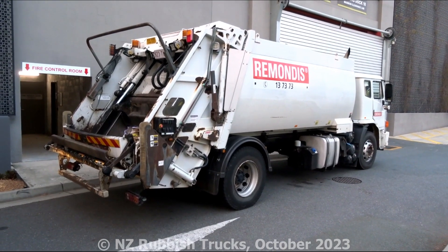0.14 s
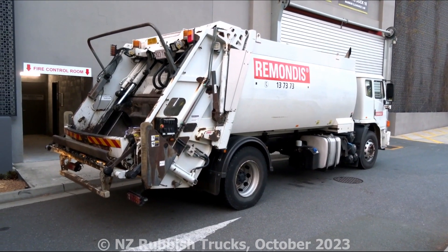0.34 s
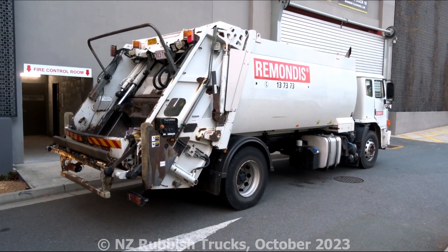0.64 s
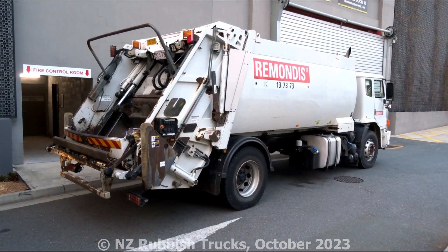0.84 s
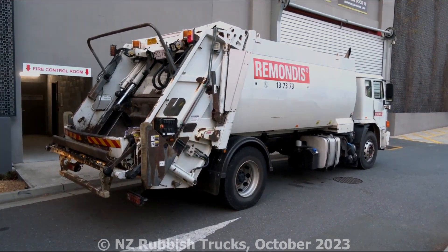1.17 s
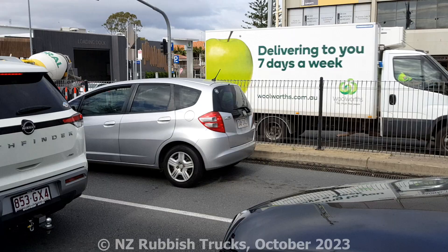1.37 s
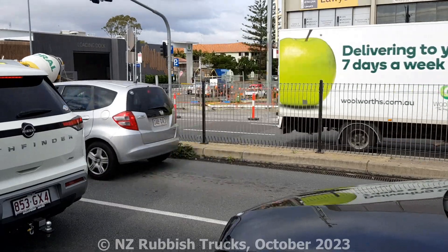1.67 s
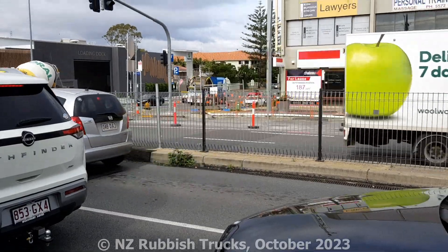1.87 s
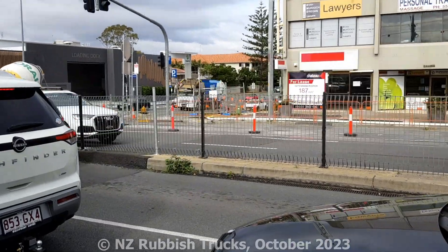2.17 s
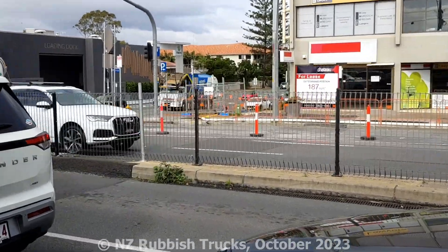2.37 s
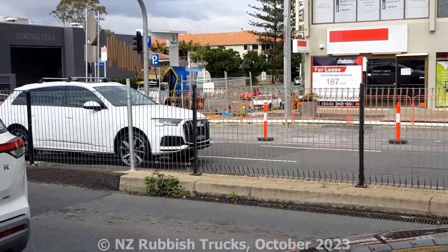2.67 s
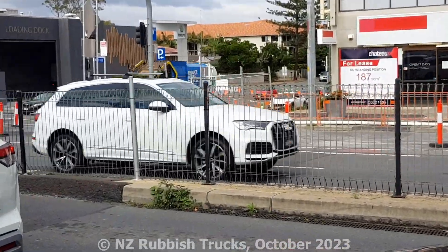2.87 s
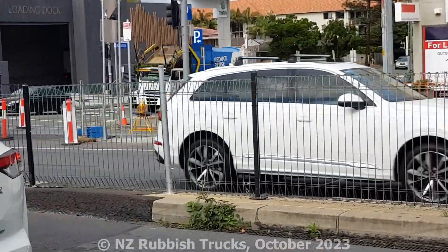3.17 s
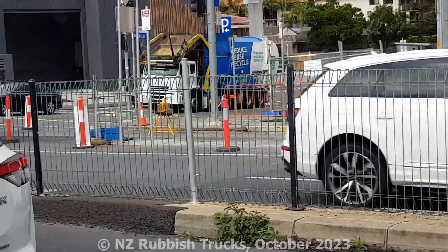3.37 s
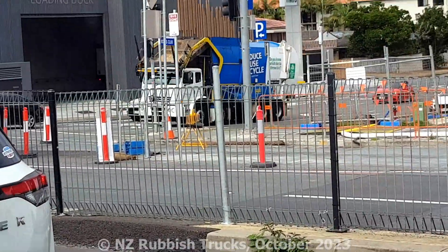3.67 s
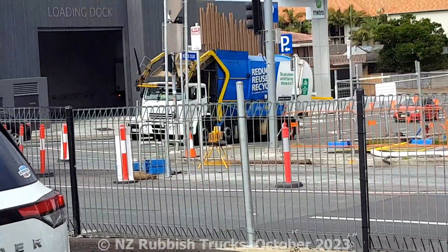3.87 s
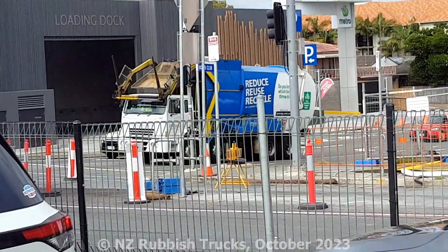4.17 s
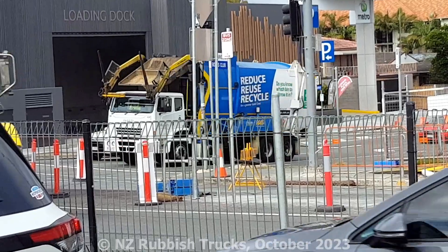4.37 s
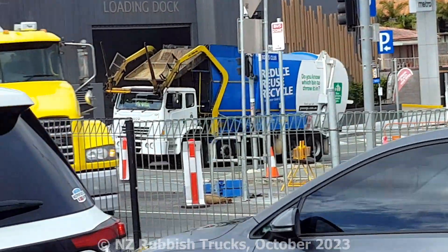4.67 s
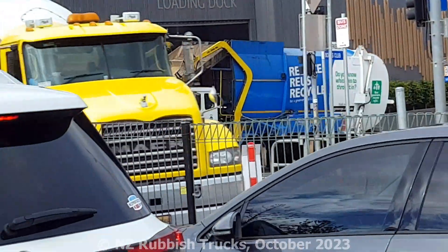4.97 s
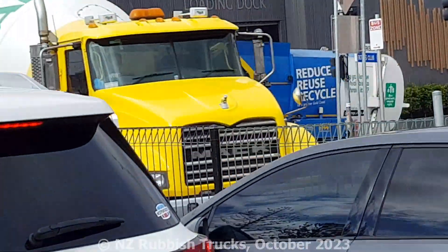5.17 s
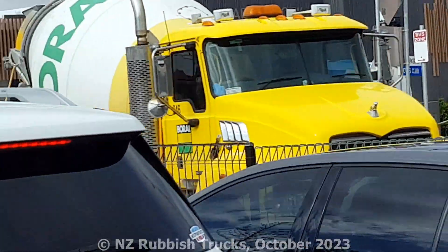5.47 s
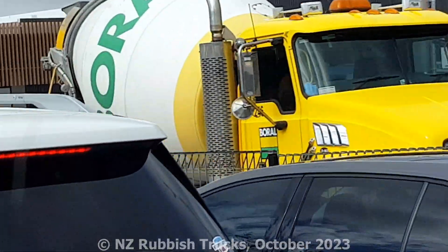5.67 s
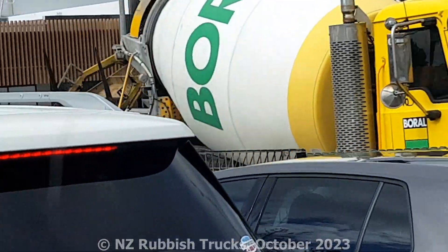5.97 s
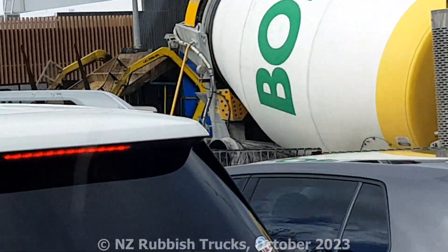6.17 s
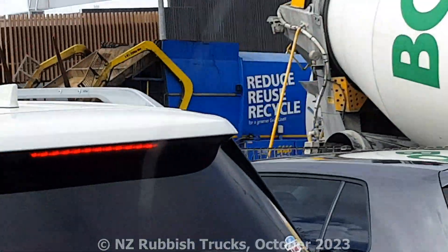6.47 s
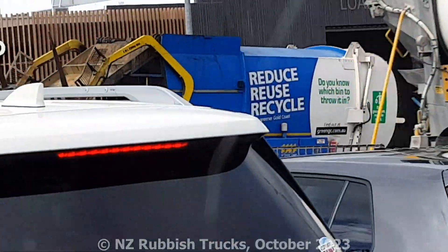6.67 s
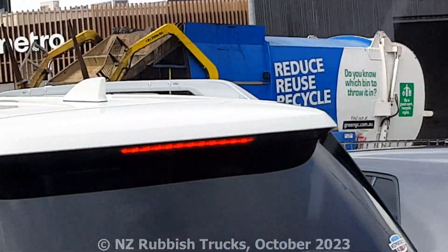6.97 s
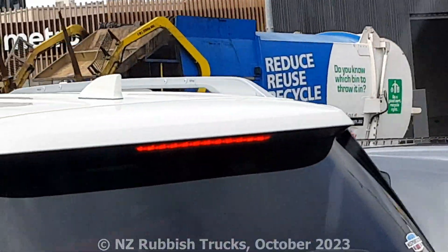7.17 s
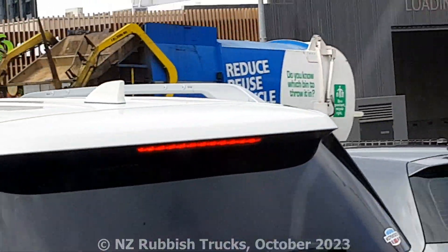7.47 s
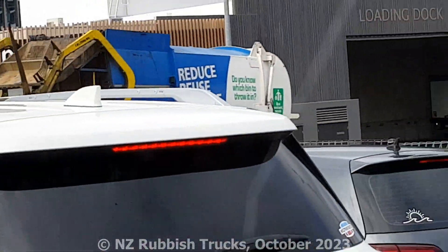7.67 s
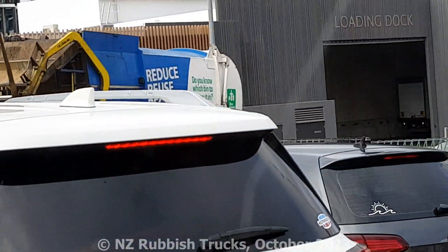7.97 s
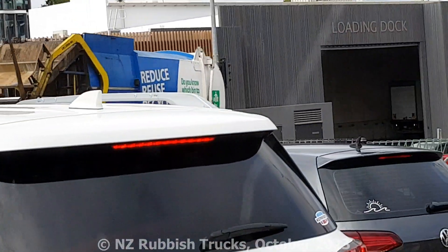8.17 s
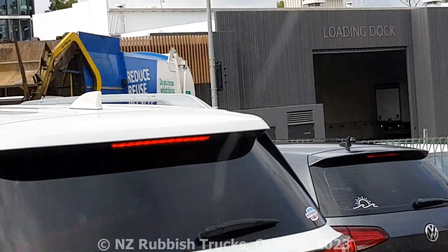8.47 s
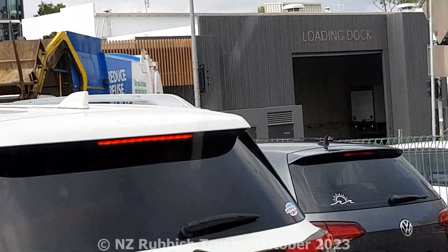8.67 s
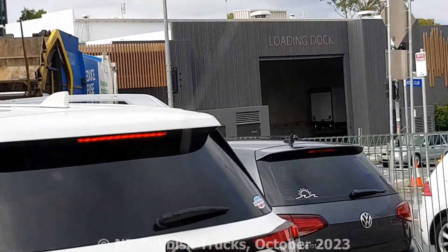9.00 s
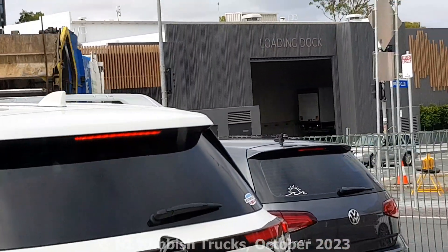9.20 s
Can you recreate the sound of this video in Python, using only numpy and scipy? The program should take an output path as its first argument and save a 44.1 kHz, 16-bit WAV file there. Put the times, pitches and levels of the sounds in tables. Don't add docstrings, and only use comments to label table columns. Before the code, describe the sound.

Close, harsh truck pump whine over a rough engine, a blink of silence, then a muffled car interior as a heavy truck pulls past outside.

```python
import sys
import numpy as np
from scipy import signal
from scipy.fft import next_fast_len
from scipy.io import wavfile
from scipy.ndimage import uniform_filter1d

SR = 44100
rng = np.random.default_rng(int(sys.argv[2]) if len(sys.argv) > 2 else 0)


def inscribe(sig):
    pcm = np.round(np.clip(np.atleast_2d(sig).T, -1, 1) * 32767)
    wavfile.write(sys.argv[1], SR, pcm.astype(np.int16))


def convert_level_to_amplitude(level_db):
    exponent = np.asarray(level_db, float) / 20
    return 10 ** exponent


N = 411894
CABIN_S = 1.4635

# frequency in Hz, left minus right in dB.
ALLEY_PAN = [(60, 0.0), (130, 0), (290, 0.5), (640, 1), (1410, 2), (3100, -3.5), (6820, -2.5),
             (15000, -1.5)]


def read(points, hz):
    f, value = np.transpose(points)
    return np.interp(np.log(hz + 1), np.log(f + 1), value)


def evened(x):
    return x / np.sqrt(np.mean(np.abs(x) ** 2) + 1e-20)


def drift(width_hz, count):
    z = rng.standard_normal(count) + 1j * rng.standard_normal(count)
    f = np.fft.fftfreq(count, 1 / SR)
    return evened(np.fft.ifft(z / (1 + (2 * f / width_hz) ** 2)))


def smoothed_chance(z, bins, frames):
    return evened(uniform_filter1d(uniform_filter1d(z, size=bins, axis=-2), size=frames, axis=-1))


def noise(layers, same, pan, lead, patchy_db, swell_db, ripple_db, count):
    frames, hz = count // 512 + 5, np.fft.rfftfreq(2048, 1 / SR)
    a, b, c, d, patches = rng.standard_normal((frames, 1025, 5)).T
    patches = smoothed_chance(patches, 20, 6)
    swell = evened(uniform_filter1d(rng.standard_normal(frames), size=8))
    ripple = rng.standard_normal((frames // 128 + 1, 1025, 2)).T
    ripple = np.repeat(ripple, 128, axis=2)[..., :frames]
    ripple = smoothed_chance(ripple, 4, 128)

    alike = np.clip(read(same, hz), 0, 1)[:, None]
    apart = np.sqrt(1 - alike ** 2)
    left = a + 1j * b
    right = (alike * left + apart * (c + 1j * d)) * np.exp(-1j * read(lead, hz))[:, None]
    tilt = convert_level_to_amplitude(read(pan, hz))[:, None]
    power = 0
    for shape, db in layers:
        power = power + np.outer(evened(convert_level_to_amplitude(read(shape, hz))), convert_level_to_amplitude(db[:frames])) ** 2
    z = np.array([left * tilt, right]) / (1 + tilt) * np.sqrt(power)

    shared = alike * ripple[0] + apart * ripple
    shared *= np.clip(hz / 3000, 0.2, 1)[:, None]
    z *= convert_level_to_amplitude(patchy_db * patches + swell_db * swell + ripple_db * shared / np.sqrt(1 + alike))
    x = signal.istft(z, nperseg=2048, noverlap=1536)[1][:, :count]
    return x * np.sqrt(power.mean() / np.mean(x.mean(0) ** 2))


def panned(x, pan_db):
    left = convert_level_to_amplitude(pan_db)
    return np.array([left * x, x]) * 2 / (1 + left)


def pump_whine(count):
    # frequency in Hz, waver width in Hz, level in dB rms.
    teeth = [(226, 8, -52), (377, 8, -47), (484.5, 12, -39), (576.5, 8, -40), (715, 10, -44),
             (850.6, 12, -33.5), (1308, 10, -47), (1546, 16, -46), (1832, 18, -38), (2046, 12, -48),
             (2153.5, 6, -38), (2278.5, 8, -36), (2400.5, 8, -40), (2525, 12, -36), (2618, 24, -36),
             (3004, 35, -41), (3122, 20, -49), (3386, 12, -57), (3585, 10, -54), (3710, 8, -50),
             (3925, 12, -50), (4773, 60, -50), (5543, 25, -60), (5922, 20, -66)]
    t, out = np.arange(count) / SR, np.zeros((2, count))
    for hz, width_hz, db in teeth:
        loose = np.clip(width_hz / 25, 0, 1)
        waver = np.sqrt(1 - loose ** 2) + loose * drift(2 * width_hz, count)
        ports = [waver + 0.17 * drift(4.8 + width_hz, count) for _ in range(2)]
        turn = np.exp(2j * np.pi * (hz * t + rng.random()))
        pan_db = read(ALLEY_PAN, hz) * np.array([[0.5], [-0.5]])
        out += convert_level_to_amplitude(db + 3.0 + pan_db) * (ports * turn).real
    return out


def refuse_truck():
    # frequency in Hz, density in dB per Hz.
    block = [(18, -61), (30, -42), (85, -28), (135, -16.5), (270, -15.5), (319, -7), (391, -11.5),
             (479, -3.5), (782, -8.5), (850, 2), (941, -10.5), (1100, -5), (1190, -7), (1390, -3),
             (1700, -20), (2210, -40), (3740, -120)]
    # frequency in Hz, density in dB per Hz.
    pipes = [(880, -33), (1500, -2.5), (1650, -5), (1860, 1.5), (1950, -8.5), (2210, -1), (2550, 2.5),
             (2770, -8), (3080, -3), (3320, -14), (3830, -8), (4040, -15.5), (4300, -28.5), (5590, -58),
             (9460, -120)]
    # frequency in Hz, density in dB per Hz.
    valves = [(2470, -38), (4200, -18), (4490, -4), (4600, -12), (4770, 3), (4930, -6.5), (5170, -7),
              (5710, -5), (7730, -10.5), (10600, -5), (10900, -2), (14200, -42), (22000, -120)]
    # frequency in Hz, likeness from 0 to 1.
    alley_same = [(60, 0.86), (130, 1), (290, 0.98), (640, 1), (1410, 0.88), (3100, 0.92), (6820, 0.73),
                  (15000, 1)]
    shaft_hz, edge_hz = 26.6, 11020
    fade_s, silent_s = 1.398, 1.422
    count = next_fast_len(round(1.5 * SR))
    t = np.arange(count) / SR
    block_db, pipes_db, valves_db = np.outer([-24.5, -25.5, -40.0], np.ones(count))

    ports = alley_same, ALLEY_PAN, [(1, 0)]
    roar = noise([(block, block_db), (pipes, pipes_db)], *ports, 0.47, 0.21, 4.25, count)
    turns = shaft_hz * t + 0.35
    knock = 1 + 0.12 * np.cos(2 * np.pi * turns) + 0.06 * np.cos(6 * np.pi * turns)
    clatter = noise([(valves, valves_db)], *ports, 1.4, 0.43, 1.8, count) * knock
    edge = signal.firwin(801, edge_hz, window=("kaiser", 10), fs=SR)
    sound = signal.oaconvolve(roar + clatter + pump_whine(count), edge[None], "same")
    fade = np.clip((silent_s - t) / (silent_s - fade_s), 0, 1)
    return np.pad(sound * fade, ((0, 0), (0, N - count)))


def cabin_levels():
    queue_s, turn_s, turn_length_s = 1.54, 5, 0.36
    t = np.arange(N // 512 + 8) * 512 / SR
    since = np.maximum(t - CABIN_S, 0)
    queue = np.exp(-(since / queue_s) ** 2)
    turned = 0.5 + 0.5 * np.tanh((t - turn_s) / turn_length_s)
    rumble_db = -34 + 2.5 * queue + 0.94 * turned
    tyres_db = -45.5 - 2 * since - 2 * turned
    blow_db = -45 + 0.85 * queue + 1.32 * turned
    fizz_db = -61 + 3.5 * queue
    duct_db = -53 + 1.5 * turned
    return rumble_db, tyres_db, blow_db, fizz_db, duct_db


def cabin_air():
    # frequency in Hz, density in dB per Hz.
    rumble = [(10, -13), (45, -9), (58, -3), (100, -5), (170, -5), (220, -8.5), (278, -16.5), (369, -14.5),
              (457, -20.5), (607, -32.5), (800, -62.5)]
    # frequency in Hz, density in dB per Hz.
    tyres = [(300, -70), (560, -35), (700, 1), (780, 3.5), (900, 4.5), (1000, -26), (1300, -24),
             (1700, -4.5), (2200, -12), (4000, -60), (10000, -58), (13000, -47), (15600, -54)]
    # frequency in Hz, density in dB per Hz.
    blow = [(250, -50), (500, -15), (611, -15), (769, -3.5), (900, -3), (1270, -7.5), (1470, -6.5),
            (1680, -7.5), (1880, -12.5), (2390, -11.5), (2930, -14), (6180, -20.5), (7670, -32.5),
            (11000, -43)]
    # frequency in Hz, density in dB per Hz.
    fizz = [(4000, -60), (7000, -25), (8600, -13), (10100, -5), (11500, -10), (12900, -15), (13800, -22),
            (14800, -27), (15700, -31)]
    # frequency in Hz, density in dB per Hz.
    duct = [(900, -70), (1320, -24), (1400, -4), (1465, 7), (1550, -9), (1630, -24), (2250, -35),
            (2400, -4), (2520, -35), (3500, -70)]
    # frequency in Hz, likeness from 0 to 1.
    cabin_same = [(60, 1), (250, 0.88), (450, 0.84), (610, 0.36), (780, 0.95), (1050, 0.4), (1400, 0.5),
                  (2000, 0.2), (6000, 0), (9000, 0.34)]
    # frequency in Hz, left minus right in dB.
    cabin_pan = [(60, 8), (270, 8), (450, 9), (740, 6), (1300, 10), (1700, 7), (2700, 11), (3900, 7),
                 (4700, 9), (6000, 14), (7500, 12), (10000, 23), (12900, 12), (13200, 18)]
    # frequency in Hz, lead of the left in radians.
    cabin_lead = [(700, -0.33), (1000, -1), (1900, -2), (2500, -3.5)]
    layers = list(zip((rumble, tyres, blow, fizz, duct), cabin_levels()))
    return noise(layers, cabin_same, cabin_pan, cabin_lead, 0.6, 0.14, 1.9, N)


def idle_tones():
    # frequency in Hz, level in dB rms.
    idle = [(21.685, -40), (36.19, -48), (40.615, -39), (43.372, -43)]
    in_step_s = 8.12
    t = np.arange(N) / SR - in_step_s
    return sum(np.sqrt(2) * convert_level_to_amplitude(db) * np.cos(2 * np.pi * hz * t) for hz, db in idle)


def gaps(rows):
    edge_power = 5
    t = np.arange(0, N + 256, 256) / SR
    power = 0
    for s, length_s, db, db_per_s in rows:
        opening = np.exp(-np.abs(2 * (t - s) / length_s) ** edge_power)
        power = power + convert_level_to_amplitude(db + db_per_s * (t - s)) ** 2 * opening
    return np.interp(np.arange(N) / SR, t, np.sqrt(power))


def hauler():
    # time in seconds, firing rate in Hz.
    engine_speed = [(1.46, 64.8), (2.15, 65.7), (2.6, 70.8), (3.0, 73.6), (3.3, 74.8), (3.45, 77.5),
                    (4.1, 81.7), (5.2, 86.2), (5.8, 88), (6.0, 89.7), (6.42, 90), (6.75, 67.5),
                    (7.07, 59.6), (7.3, 61.8), (9.34, 73.6)]
    # middle in seconds, length in seconds, level in dB, slope in dB per second.
    note_gaps = [(2.1, .55, -41, -3), (2.88, 0.73, -25.5, 4), (3.47, 0.25, -32, 8), (3.95, 0.62, -27, -3.5),
                 (4.6, 0.8, -34.5, -10), (5.5, 0.65, -26, 1.5), (6.0, .3, -37, 5), (6.45, 0.67, -26, 6.5),
                 (6.9, .3, -31, 2), (7.17, 0.2, -31.5, 1.5), (7.48, 0.17, -35, 1.5), (8.0, .65, -35.5, -3),
                 (8.6, 0.2, -35, -5), (9.0, 0.51, -39, 6)]
    # middle in seconds, length in seconds, level in dB, slope in dB per second.
    octave_gaps = [(1.65, 0.28, -33.5, 9), (2.02, 0.24, -33.5, 5), (2.5, 0.58, -32.5, 3),
                   (3.05, 0.41, -34.5, -2), (3.6, 0.43, -39, -3), (4.2, 0.284, -31, 13),
                   (4.9, 0.65, -36.5, -1), (5.55, 0.36, -45, -6), (6.65, 0.37, -36, 10),
                   (6.98, 0.24, -29, -6), (7.37, 0.29, -30, -8), (8.0, 0.35, -40, 5), (9.1, 0.4, -40.5, 8)]
    hidden_db = -61
    hz = np.interp(np.arange(N) / SR, *np.transpose(engine_speed))
    turns = 2 * np.pi * np.cumsum(uniform_filter1d(hz, size=4000)) / SR
    flutter = 0.91 + 0.25 * drift(4.7, next_fast_len(N))[:N]
    note = (gaps(note_gaps) + convert_level_to_amplitude(hidden_db)) * np.sin(turns)
    octave = (gaps(octave_gaps) + convert_level_to_amplitude(hidden_db)) * (flutter * np.exp(2j * turns)).real
    return np.sqrt(2) * (note + octave)


def van():
    # middle in seconds, length in seconds, level in dB, slope in dB per second.
    van_gaps = [
        (8.17, .42, -36, -1.5),
        (9.03, .38, -34.5, -3),
    ]
    start_hz, at_s, hz_per_s = 82.6, 8.6, 8.5
    hz = start_hz + hz_per_s * (np.arange(N) / SR - at_s)
    return np.sqrt(2) * gaps(van_gaps) * np.sin(2 * np.pi * np.cumsum(hz) / SR)


def ping():
    at_s, hz, db, t60_s = 8.2725, 8950, -50, 0.09
    t = np.maximum(np.arange(N) / SR - at_s, 0)
    return panned(convert_level_to_amplitude(db - 60 * t / t60_s) * np.sin(2 * np.pi * hz * t), 14)


def ticks():
    # time in seconds, peak in dB.
    snaps = [
        (9.036, -49),
        (9.1252, -31),
    ]
    # delay in seconds, level in dB.
    bounces = [
        (.0013, -3),
        (.0042, -12),
        (.0075, -16),
    ]
    out, t = np.zeros((2, N)), np.arange(400) / SR

    def ring(hz, decay_s):
        return np.sin(2 * np.pi * hz * t) * np.exp(-t / decay_s)

    low = ring(3400, 0.0006) + 0.7 * ring(4200, 0.0005) + 0.5 * ring(5000, 0.0005)
    high = 0.8 * ring(10000, 0.0007) + 0.5 * ring(11300, 0.0005) + 0.2 * ring(13500, 0.0003)
    attack = 1 - np.exp(-t / 0.0004)
    click = attack * (panned(low, 8) + 0.8 * panned(high, 18))
    for s, db in snaps:
        for delay_s, bounce_db in [(0.00055, 0), *bounces]:
            start = round((s + delay_s) * SR)
            out[:, start:start + 400] += 2.1 * convert_level_to_amplitude(db + bounce_db) * click
    return out


def cabin():
    engines = panned(idle_tones() + hauler() + van(), 8.3)
    sound = cabin_air() + engines + ping() + ticks()
    return sound * np.clip((np.arange(N) / SR - CABIN_S) / 0.001, 0, 1)


def scene():
    return refuse_truck() + cabin()


def roll_off(x):
    return signal.sosfilt(signal.butter(12, 15700, fs=SR, output="sos"), x)


def record(dry):
    top_hz = 15650
    top = signal.firwin(401, top_hz, window=("kaiser", 9), fs=SR)
    mix = signal.oaconvolve(dry, top[None], "same")
    return roll_off(mix)


dry = scene()
out = record(dry)
inscribe(out)
```